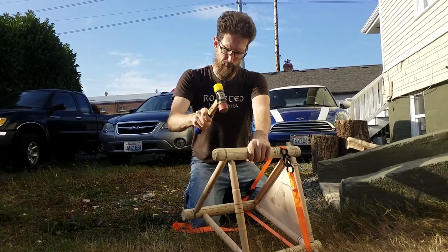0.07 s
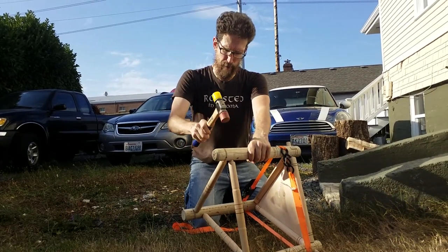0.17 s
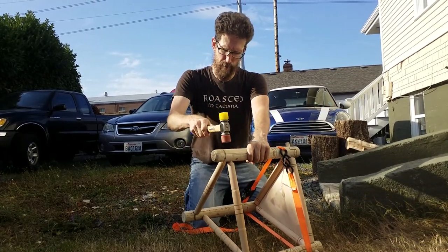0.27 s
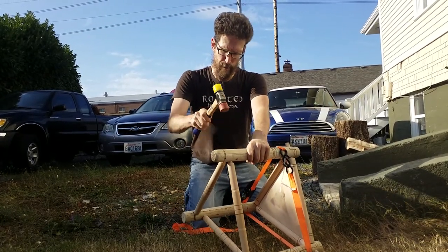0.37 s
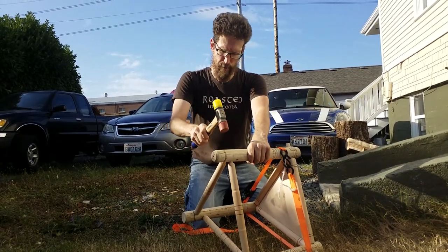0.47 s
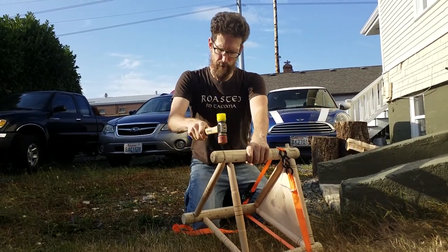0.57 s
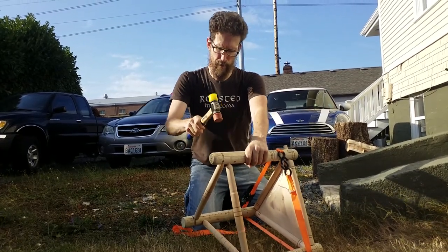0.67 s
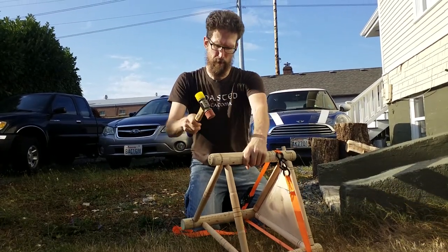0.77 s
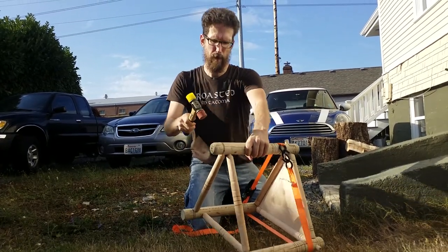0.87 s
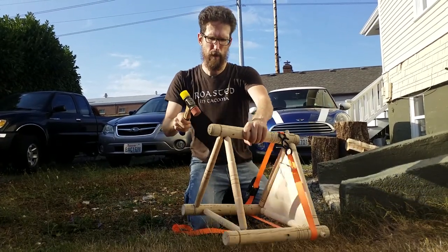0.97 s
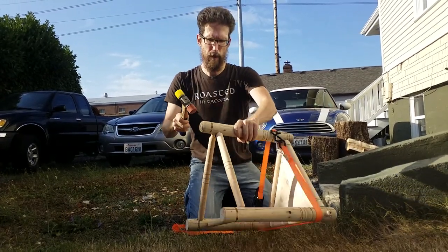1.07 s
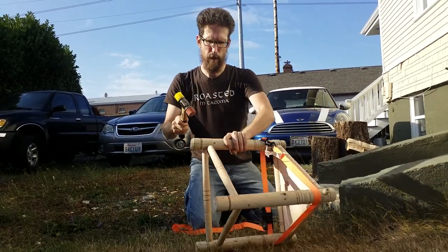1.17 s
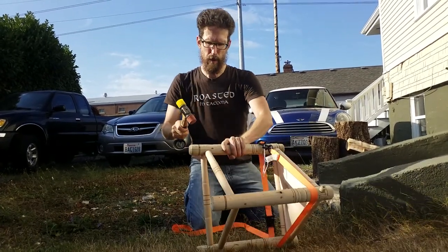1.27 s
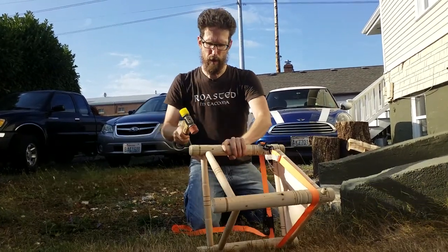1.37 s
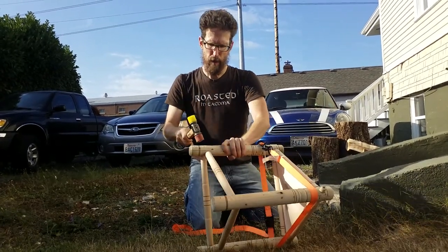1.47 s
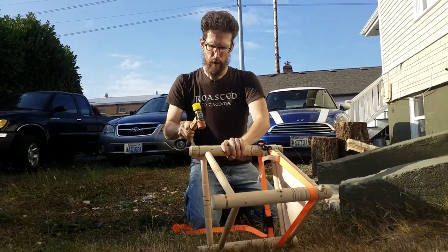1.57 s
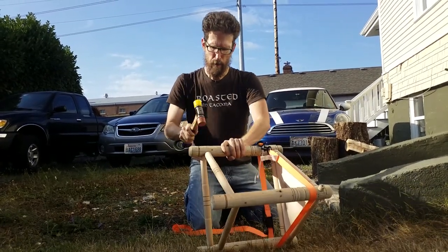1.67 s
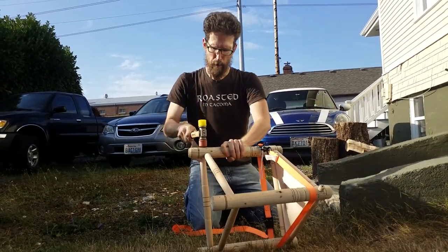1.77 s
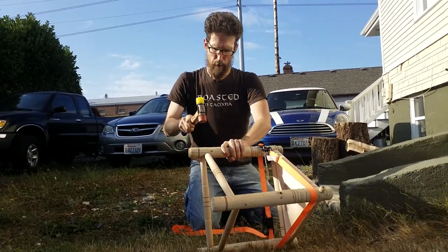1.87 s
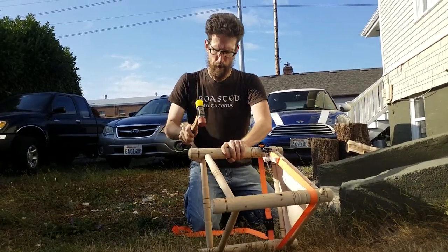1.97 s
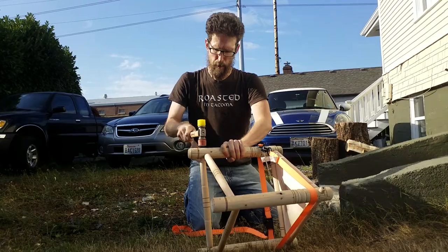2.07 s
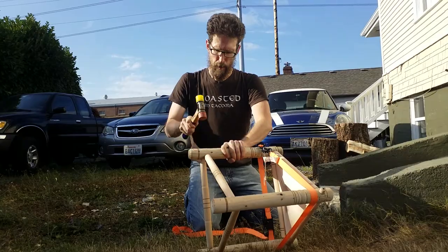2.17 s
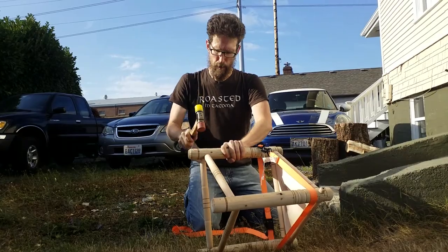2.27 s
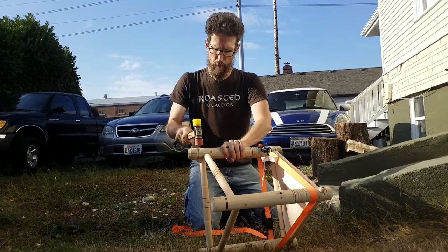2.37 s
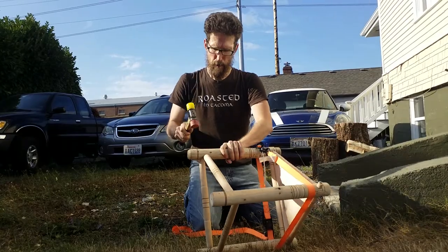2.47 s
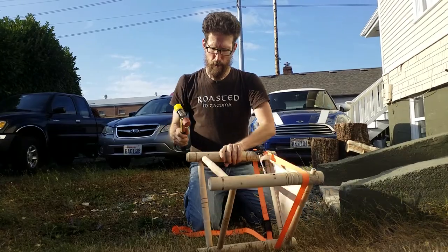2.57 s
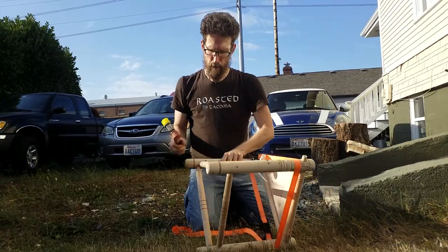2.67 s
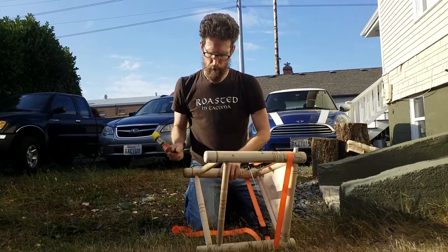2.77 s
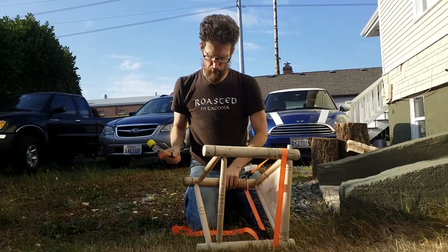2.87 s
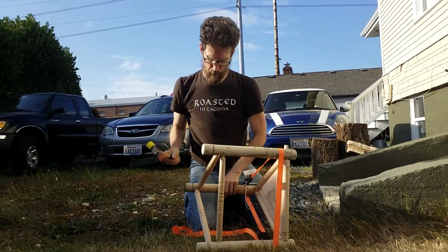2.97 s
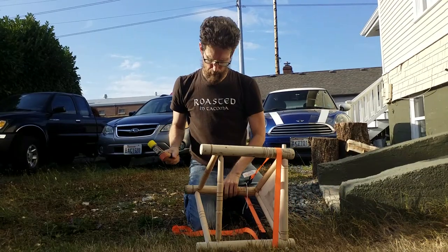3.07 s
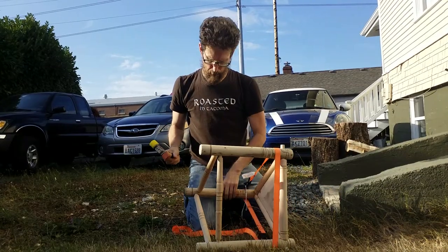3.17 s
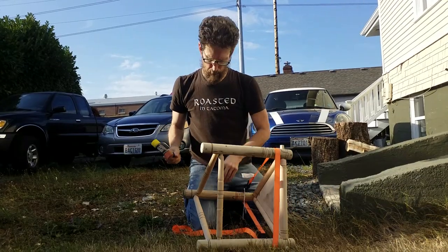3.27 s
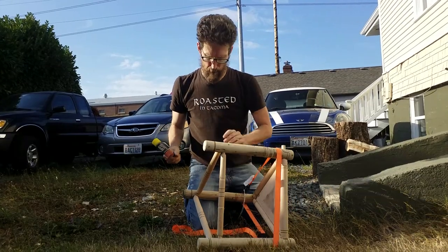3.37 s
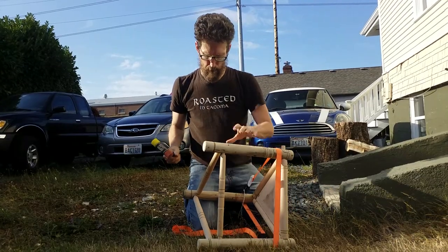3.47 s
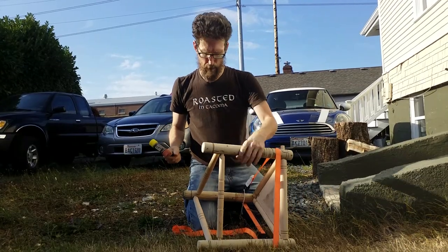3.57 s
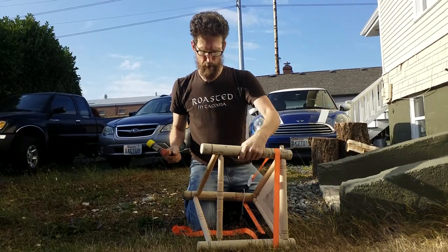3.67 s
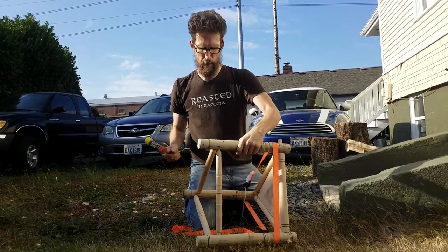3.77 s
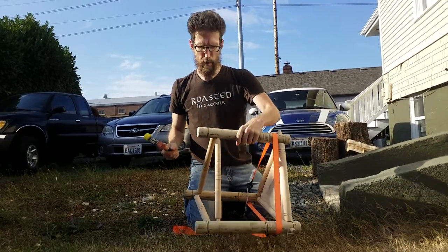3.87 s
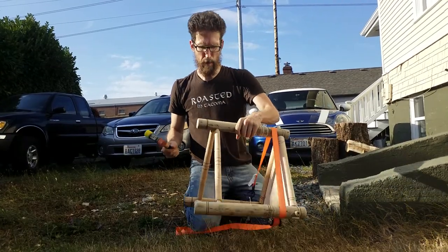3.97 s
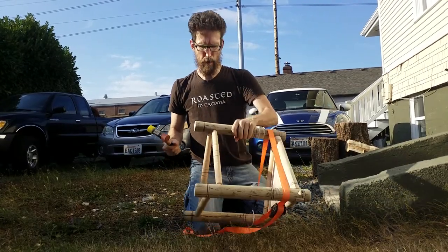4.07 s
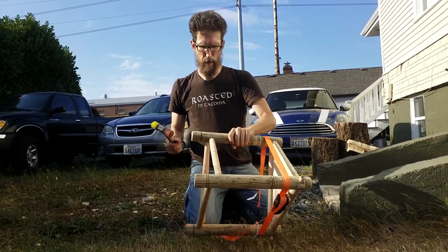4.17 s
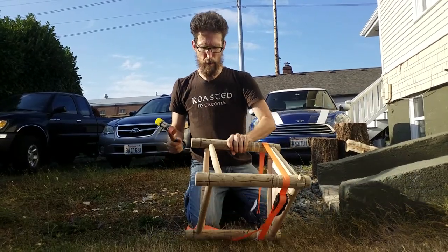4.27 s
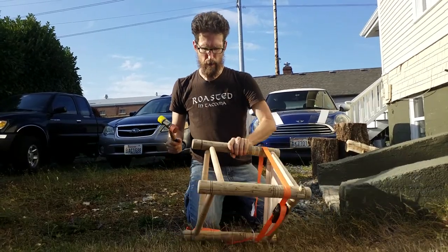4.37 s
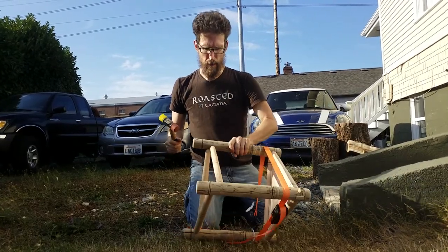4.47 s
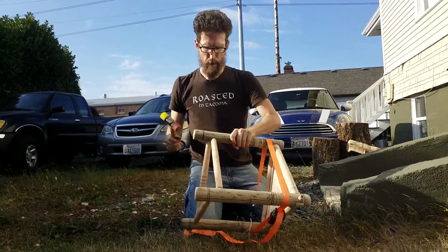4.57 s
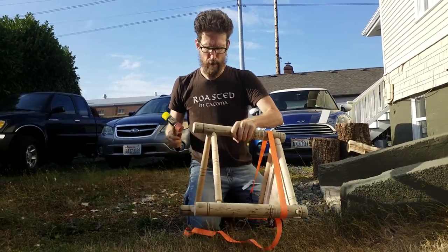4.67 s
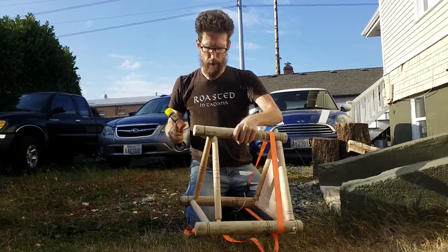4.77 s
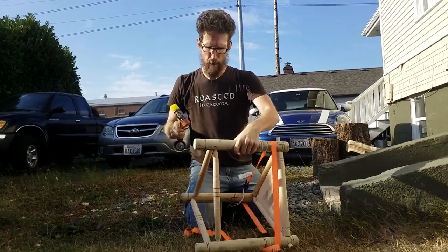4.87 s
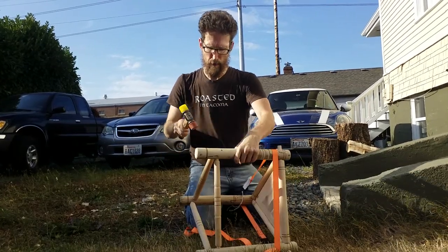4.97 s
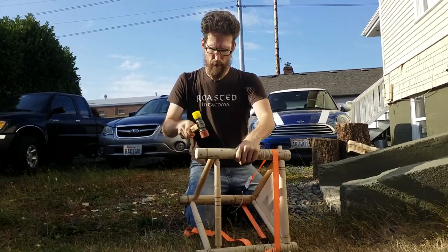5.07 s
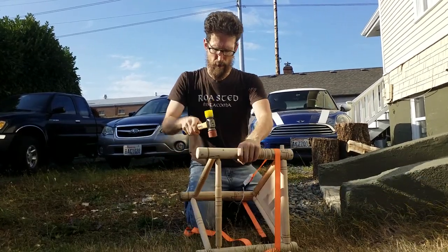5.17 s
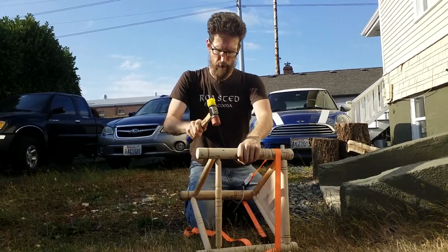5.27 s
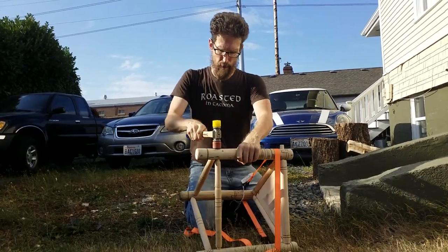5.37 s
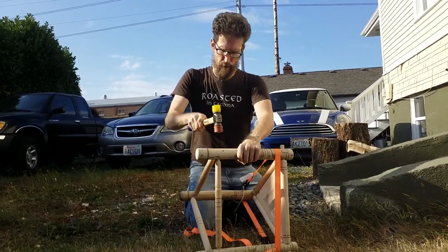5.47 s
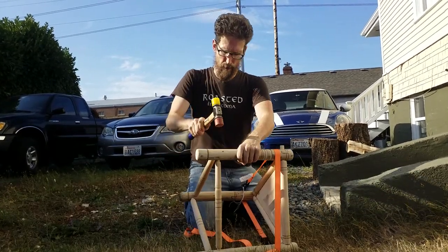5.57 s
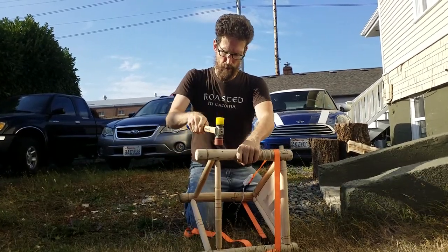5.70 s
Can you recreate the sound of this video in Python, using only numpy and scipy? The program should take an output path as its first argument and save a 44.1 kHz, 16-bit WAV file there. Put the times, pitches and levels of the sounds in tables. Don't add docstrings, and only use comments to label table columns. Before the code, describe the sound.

Hollow wooden knocks with loose chatter and a quick wall echo, straps hissing, dry grass scuffing, while vehicles drone and pass behind.

```python
import sys
import numpy as np
from scipy import signal
from scipy.fft import rfft, irfft, next_fast_len
from scipy.io import wavfile
from scipy.ndimage import uniform_filter1d

SR = 44100
rng = np.random.default_rng(int(sys.argv[2]) if len(sys.argv) > 2 else 0)


def convert_level_to_amplitude(level_db):
    exponent = np.asarray(level_db, float) / 20
    return 10 ** exponent


def master(y):
    cut = np.clip(np.atleast_2d(y).T, -1, 1)
    pcm = np.round(cut * 32767)
    wavfile.write(sys.argv[1], SR, pcm.astype(np.int16))


N = 252869
T = np.arange(N) / SR

# [t/s, nearness level/dB, exhaust effort level/dB]
VEHICLES = [(0.0, -3.5, -14), (0.4, -6, -11), (0.7, -11.5, -23), (0.95, -15.5, -13), (1.2, -12, -24.5),
            (1.55, -11, -20.5), (1.75, -13.5, -34), (2.4, -13.5, -39.5), (2.65, -13, -30), (3.0, -6, -18.5),
            (3.2, -6, -5.5), (3.6, 0.6, -2), (4.1, -0.5, 1), (4.28, -0.5, 2), (4.7, -2.5, -5.5),
            (4.95, -5.5, -9.5), (5.15, -5, -5.5), (5.73, -7, -14.5)]
# [t/s, f/Hz]
FIRING_RATE = [(0, 140.7), (.6, 134.7), (1.2, 141.9), (2.6, 143.6), (3.0, 142.3), (3.3, 140.2), (4.0, 141),
               (4.5, 143.1), (4.9, 140.5), (5.73, 143.1)]
CYLINDERS = 8
# [multiple, level/dB]
ORDER_LEVELS = [(1, -63.5), (2, -42), (3, -20), (4, -48), (5, -1.5), (6, -12.5), (7, -3), (8, 8), (9, -37),
                (10, -11), (11, -16.5), (12, -31), (13, -12), (14, -16), (15, -12.5), (16, -12), (17, -19),
                (18, -25), (19, -49), (20, -22.5), (21, -26), (22, -26.5), (23, -33), (24, -73)]
BOOM_CENTRES = [
    5,
    8,
    14.5,
    20,
]
# [closest-pass level/dB, share of nearness, share of effort,
# share of a beating twin tone, beat f/Hz, t/s of a beat's top]
BOOMS = [
    (-28.5, 0.05, 0.58, 0.51, 3.026, 3.56),
    (-16, 0.01, 0.97, 0.19, 4.85, 4.27),
    (-32, 1, 0.23, 0.045, 2.7, 3.9),
    (-39, 0.84, 0.2, 0.044, 2, 5.2),
]
TWIN_FADES = 0.16
ENGINE_PAN_DB = -0.65
# [start t/s, end t/s, f/Hz, level/dB]
HUMS = [(-.2, 0.48, 258, -30), (-.2, 0.254, 160, -38), (1.49, 2.397, 330, -47.5),
        (1.706, 2.5, 128.2, -50), (4.232, 4.666, 230.3, -22), (1.106, 1.85, 89.9, -35),
        (2.184, 3.2, 235, -45.5), (2.457, 3.407, 286, -42), (2.503, 3.201, 363, -43),
        (4.595, 5.304, 233.3, -32), (3.296, 4.05, 280.7, -29), (3.3, 4.26, 356.2, -34.5)]
# [f/Hz, level/dB]
ROAR_COLOUR = [(45, -28), (90, -6.5), (150, -10), (250, -19.5), (400, -20), (500, -20), (850, -16.5),
               (1200, -25), (2000, -34), (3000, -39), (5000, -48), (8000, -56.5)]
ROAR_DB = -40.5
# [t/s, f/Hz]
WHINE_PITCH = [(0, 3050), (3.4, 3100), (3.97, 3060), (4.06, 2870), (5.73, 2790)]
WHINE_FAR_DB, WHINE_NEAR_DB, WHINE_NEAR_S = -76.5, -47, 3.92
WHINE_COMES_DB_S, WHINE_GOES_DB_S = 21.5, 18
# [t/s, level/dB]
WIND = [(0.0, -32), (0.2, -34.5), (0.91, -27), (1.47, -34), (1.8, -40.5), (2.0, -60), (3.2, -70),
        (3.6, -44), (4.1, -37), (5.73, -38)]
# [f/Hz, correlation]
LIKENESS = [(25, 0.27), (60, 0.14), (125, 1), (1000, 0.87), (2000, 0.32), (8000, 0.16)]
# [top t/s, level/dB, swell s per 10 dB, fade s per 10 dB]
RUBS = [(0.0, -52, .05, 0.11), (.11, -58.5, .01, 0.064), (0.421, -55, .1, 0.016), (.656, -42, 0.024, 0.058),
        (.8, -46.5, 0.1, .12), (1.166, -41.5, 0.058, 0.086), (1.35, -61.5, 0.026, 0.18),
        (1.55, -63.5, 0.056, 0.52), (2.54, -59.5, 0.022, 0.081), (2.95, -55, 0.37, 0.13),
        (3.22, -51, 0.21, 0.21), (3.508, -40.5, 0.015, 0.096), (3.68, -44, .05, 0.59),
        (4.126, -45.5, 0.11, .03), (4.22, -67, 0.099, 0.085), (4.31, -38.5, 0.056, .02),
        (4.345, -22.5, 0.014, 0.011), (4.41, -48.5, 0.014, 0.016), (4.52, -43.5, 0.23, 0.067),
        (4.7, -55, 0.024, 0.085), (4.82, -41, 0.013, 0.075), (4.886, -29, 0.038, 0.027),
        (5.088, -36, 0.033, 0.023), (5.2, -55, 0.19, 0.16), (5.47, -68, 0.11, 0.02),
        (5.53, -63, 0.042, 0.089), (5.69, -58, 0.066, .015)]
STILL_GRASS_DB, HISS_TOP_HZ = -85, 15750
# [t/s, level/dB, t60/s, f/Hz, broad hiss level/dB]
STRAP_SHAKES = [
    (0.171, -22, 0.27, 8360, -15),
    (0.464, -20.5, 0.24, 9200, -24),
    (1.677, -20.5, 0.2, 9200, -32),
    (1.974, -54, 0.15, 8600, -17),
    (2.265, -47, 0.08, 8540, -20),
    (5.302, -37.5, 0.27, 9200, -1),
    (5.575, -29, 0.27, 8300, -6),
]

# [t/s, thud level/dB, knock level/dB, crack level/dB, chatter t60/s]
UPRIGHT = [
    (0.1725, -11, -12, -5, 0.022),
    (0.1775, -8, -16, -31, 0.068),
    (0.188, -13.5, -29, -16.5, 0.033),
]
UPRIGHT_AGAIN = [
    (0.461, -9, -11.5, -2, 0.018),
    (.465, -13, -11.5, -18, 0.034),
    (0.471, -12.5, -13.5, -13, 0.019),
    (0.48, -17.5, -23.5, -19, 0.07),
]
SEATING = [
    (1.6755, -32, -14.5, -13, 0.049),
    (1.686, -32, -13, -11.5, 0.03),
    (1.692, -40, -19.5, -23.5, 0.031),
    (1.699, -34, -25, -26.5, 0.1),
    (1.714, -45, -27, -40, .05),
    (1.7285, -45, -24, -40, .04),
]
TURNED = [
    (1.971, -42.5, -19.5, -20.5, 0.035),
    (1.975, -41.5, -12.5, -20, 0.04),
    (1.979, -46, -14.5, -26.5, 0.034),
    (1.988, -40, -26, -39, 0.046),
]
TURNED_AGAIN = [
    (2.2615, -40, -15.5, -30, 0.021),
    (2.2655, -49, -8.5, -14, 0.032),
    (2.27, -50, -15, -20.5, 0.026),
    (2.276, -47, -23.5, -33.5, 0.051),
]
SET_DOWN = [
    (4.894, -22, -23, -27.5, 0.049),
    (4.8895, -42, -26.5, -40, 0.03),
]
BACK = [
    (5.301, -19, -8, -13, 0.027),
]
BACK_REBOUND = [
    (5.3125, -12.5, -8, -30, 0.015),
    (5.317, -18, -16, -37.5, 0.059),
    (5.5865, -11.5, -5, -30, 0.026),
    (5.591, -12.5, -16, -31, .04),
    (5.6, -16, -23, -41.5, 0.082),
    (5.621, -40, -24, -45, .07),
]
LAST = [
    (5.5735, -30, -14.5, -12, 0.04),
]
# [f/Hz, level/dB, t60/s]
UPRIGHT_MODES = [(118, -3, 0.19), (254, 4, 0.18), (315, -5.5, 0.24), (390, -3, 0.1), (445, 3, 0.08),
                 (495, 2, .05), (630, 6, 0.015), (1097, 1, 0.02), (1298, -4, 0.016), (1478, -2, 0.016),
                 (2150, -9.5, .02), (2470, -14, 0.018), (2860, -7, 0.015), (3500, -7, 0.012),
                 (4930, -20, 0.017)]
UPRIGHT_AGAIN_MODES = [(116.5, -1.5, 0.19), (251.5, 5, 0.12), (322, -2.5, 0.19), (395, -1, 0.1),
                       (480, 3, 0.06), (545, 4, 0.06), (706, -4, .02), (1190, 1.5, 0.022),
                       (1330, -3.5, 0.017), (2050, -14.5, .02), (2300, -11, 0.0098), (2796, -15, 0.015),
                       (3650, -29, 0.013)]
SEATING_MODES = [(247, -2, 0.25), (330, -4.5, 0.099), (466, -15, 0.055), (617, 1, 0.025), (931, -1, 0.03),
                 (1233, 0, 0.025), (1400, -1, 0.017), (1534, -10, 0.022), (2050, -13, 0.02),
                 (2360, -9.5, 0.025), (2750, -12.5, 0.025), (3400, -25, .015)]
TURNED_MODES = [(179, -20, 0.074), (253.4, 7, 0.19), (406, 8.5, 0.22), (420, -2, 0.15), (656, -5, 0.011),
                (1084, 2, 0.03), (1320, -2, 0.025), (1580, -4, .015), (2070, -1.5, 0.014),
                (2520, -5.5, 0.01), (3355, -8.5, 0.0236), (3540, -17.5, 0.008), (4670, -8.5, 0.0085)]
TURNED_AGAIN_MODES = [(179, -20, 0.074), (249, 10, 0.29), (390, 9, 0.19), (535, -4.5, 0.0185),
                      (756, -9.5, 0.025), (1120, -13, 0.02), (1380, 3, 0.022), (2310, -6.5, 0.011),
                      (3395, -10.5, 0.034), (3650, -11, .01), (4560, -15, 0.008)]
SET_DOWN_MODES = [(250, -4, 0.12), (369, -1, .06), (650, 1, .015), (1110, -3, .015), (1480, -3, .01),
                  (2300, -7, .012), (3700, -10, .01)]
BACK_MODES = [(120, 6, 0.15), (181, -6, 0.021), (251, -4, 0.21), (370, 3.5, 0.061), (600, -13, 0.0399),
              (826, -10, 0.0092), (1550, 5, 0.0078), (1850, -1, 0.007), (3640, -15.5, 0.01),
              (4626, -8, 0.013)]
REBOUND_MODES = [(120.5, 4, 0.1), (177, 5, 0.027), (254.5, -7, 0.2), (370, 2, 0.076), (589, -2, 0.045),
                 (833, -2, 0.012), (1174, -0.5, 0.032), (1665, -3.5, 0.014), (1993, -11, 0.027),
                 (2270, -7.5, 0.0187), (2644, -9.5, 0.014), (3700, -23, 0.018), (4530, -22, 0.017)]
LAST_MODES = [(254, 0, 0.1), (800, -1.5, 0.0086), (1250, 1.5, 0.012), (1750, -4, 0.01), (2500, -6, 0.0089),
              (3650, -5.5, 0.013), (4600, -9.5, 0.012)]
STRIKE_DB = 9
RING_SHARE = 0.7
# [t/s, level/dB]
CRACK_AIR = [(0.18, -1), (0.47, -29), (1.685, -21.5), (1.973, 0.5), (2.263, -8.5), (4.89, 5), (5.305, 9.5),
             (5.58, 8)]
# [delay t/s, level/dB, left minus right level/dB]
ECHOES = [(0.02, -24, 2), (.040, -23, 2.5), (.0535, -19.5, -1), (.063, -26, -0.5), (.09, -26, 3)]
SLAP_S, SLAP_DB = 0.0535, -16
# [t/s, peak level/dB, top f/Hz, fade t/s, left minus right level/dB]
BUFFETS = [(0.826, -37, 494, 0.0069, -8), (0.853, -18, 296, 0.017, 10), (0.886, -25, 440, 0.014, 19),
           (0.955, -18, 248, 0.024, 12), (1.008, -16, 230, 0.028, 15), (1.04, -17, 262, 0.016, 14),
           (1.084, -24, 390, .008, 10), (1.254, -24, 260.2, 0.013, 9)]
# [t/s, level/dB, f/Hz, t60/s]
TICKS = [(1.342, -51, 10000, 0.003), (1.378, -58.5, 9500, .005), (4.322, -47, 1400, .03),
         (4.335, -47, 1450, .04), (4.347, -34.5, 1400, 0.05), (4.351, -38, 1430, .05),
         (4.356, -37.5, 3700, 0.043), (4.357, -42, 850, .02), (4.4097, -28, 10600, 0.0047),
         (4.54, -39, 10900, 0.0065), (4.636, -46, 10900, 0.0064), (4.8925, -20, 570, 0.023),
         (4.894, -19.5, 734, 0.023)]
# [f/Hz, width f/Hz, level/dB]
PORT_RESONANCES = [(9200, 973, 17), (15100, 1500, -6.5)]
TOP_HZ = 16800


def unit(x):
    return x / np.sqrt(np.mean(x ** 2))


def curves(table):
    s, *columns = np.transpose(table)
    return [np.interp(T, s, c) for c in columns]


def band(x, lo_hz, hi_hz, order=2):
    sos = signal.butter(order, [lo_hz, min(hi_hz, .45 * SR)], "band", fs=SR, output="sos")
    return signal.sosfilt(sos, x)


def below(x, hz):
    return signal.sosfilt(signal.ellip(8, .3, 60, hz, fs=SR, output="sos"), x)


def ring(x, hz, t60):
    r = 1000 ** (-1 / (t60 * SR))
    w = 2 * np.pi * hz / SR
    return signal.lfilter([np.sin(w)], [1, -2 * r * np.cos(w), r * r], x)


def walk(rate):
    k = int(SR / rate)
    held = np.repeat(rng.standard_normal(N // k + 1), k)[:N]
    return 1.9 * uniform_filter1d(uniform_filter1d(held, k), k)


def wide(hz):
    table_hz, likeness = np.transpose(LIKENESS)
    c = np.clip(np.interp(np.log(hz), np.log(table_hz), likeness), 0, 1)
    mid, side = rng.standard_normal((2, N))
    return np.sqrt((1 + c) / 2) * mid + np.sqrt((1 - c) / 2) * side * np.array([[1], [-1]])


def swell(top_s, top_db, comes_db_s, goes_db_s):
    slope = np.where(T < top_s, comes_db_s, goes_db_s)
    return convert_level_to_amplitude(top_db - slope * np.abs(T - top_s))


def engine():
    step = 16
    t = T[::step]
    near_db, effort_db = np.array(curves(VEHICLES))[:, ::step]
    twin = convert_level_to_amplitude(TWIN_FADES * effort_db)
    boom_db = []
    for top, near_share, effort_share, rock, beats, top_s in BOOMS:
        beating = np.abs(1 + rock * twin * np.exp(2j * np.pi * beats * (t - top_s))) + 1e-3
        boom_db.append(top + near_share * near_db + effort_share * effort_db + 20 * np.log10(beating))
    turn = 2 * np.pi * np.cumsum(curves(FIRING_RATE)[0] / CYLINDERS)[::step] / SR
    order, db = np.transpose(ORDER_LEVELS)
    home = np.abs(order[:, None] - BOOM_CENTRES).argmin(1)
    out = 0
    for k, d, h in zip(order, db, home):
        gain = convert_level_to_amplitude(d - db[home == h].max() + boom_db[h] + 1.36 * walk(8.8)[::step])
        wander = 2 * np.pi * rng.random() + 0.15 * np.sqrt(k) * walk(7.7)[::step]
        apart = 0.058 * walk(1.0)[::step] * np.array([[1], [-1]])
        out = out + 1.37 * gain * np.sin(k * turn + wander + apart)
    for start, end, hz, hum_db in HUMS:
        flutter, drift = convert_level_to_amplitude(1.3 * walk(11)[::step]), .25 * walk(10)[::step]
        fade = np.clip(np.minimum(t - start, end - t) / 0.13, 0, 1)
        out = out + fade * convert_level_to_amplitude(hum_db) * flutter * np.sin(2 * np.pi * hz * t + drift)
    return signal.resample_poly(out, step, 1, axis=1)[:, :N]


def road():
    size = next_fast_len(N)
    octave = np.log2(np.arange(1, size // 2 + 2) * SR / size)
    colour_hz, colour_db = np.transpose(ROAR_COLOUR)
    colour = convert_level_to_amplitude(np.interp(octave, np.log2(colour_hz), colour_db))
    roar = 0
    for c in range(6, 14):
        overlap = np.cos(np.pi / 2 * np.clip(octave - c, -1, 1))
        noise = irfft(rfft(wide(2. ** c), size) * colour * overlap, size)[:, :N]
        roar = roar + convert_level_to_amplitude(0.5 * walk(9.9)) * noise
    roar /= np.sqrt(np.mean(band(roar.mean(0), 737, 2200) ** 2))
    roar_db = ROAR_DB + curves(VEHICLES)[0]

    carrier = np.cos(2 * np.pi * np.cumsum(curves(WHINE_PITCH)[0]) / SR)
    passing = convert_level_to_amplitude(WHINE_FAR_DB) + swell(WHINE_NEAR_S, WHINE_NEAR_DB, WHINE_COMES_DB_S, WHINE_GOES_DB_S)
    whine = unit(carrier * band(wide(3000), 5.4, 190)) * passing * convert_level_to_amplitude(2.0 * walk(24.91))

    gusts = convert_level_to_amplitude(2.2 * walk(5))
    wind = unit(band(wide(40), 32, 150)) * convert_level_to_amplitude(curves(WIND)[0] - 2.5) * gusts
    return roar * convert_level_to_amplitude(roar_db) + whine + wind


def rustle():
    clicks = rng.random((2, N)) < 5000 / SR
    sizes = convert_level_to_amplitude(2.3 * np.minimum(rng.exponential(size=(2, N)), 5))
    grains = clicks * sizes * rng.standard_normal((2, N))
    scrape = unit(grains) + wide(9000)
    rub = unit(band(scrape, 5530, 16000) + convert_level_to_amplitude(1.5) * band(scrape, 1300, 6000, order=1))
    power = convert_level_to_amplitude(STILL_GRASS_DB) ** 2
    for s, db, rise, fall in RUBS:
        power = power + swell(s, db, 10 / max(rise, .004), 10 / max(fall, .004)) ** 2
    return rub * np.sqrt(power) * convert_level_to_amplitude(-8.5 + 1.63 * walk(30))


def shakes():
    out = np.zeros((2, N))
    hiss = rng.standard_normal((2, N)) * convert_level_to_amplitude(1.9 * walk(190))
    for s, db, t60, hz, broad_db in STRAP_SHAKES:
        i = int(s * SR)
        t = np.arange(min(SR // 2, N - i)) / SR
        burst = hiss[:, i:i + len(t)] * (1 - np.exp(-t / 0.0079)) * 1000 ** (-t / t60)
        sizzle = band(burst, 0.92 * hz, 1.01 * hz, order=1)
        broad = convert_level_to_amplitude(broad_db) * band(burst, 6500, 16000, order=1)
        out[:, i:i + len(t)] += convert_level_to_amplitude(db) * (sizzle + broad)
    return out


def knocks(contacts, modes):
    out = np.zeros((2, N + SR // 4))
    long = np.arange(SR // 4) / SR
    push = np.sin(np.pi * np.minimum(long / 0.002, 1))
    thud = sum(convert_level_to_amplitude(g) * ring(push, hz, d) for hz, g, d in modes if hz < 500)
    t = long[:SR // 8]
    apart = .8 * np.array([[1], [-1]])
    for s, thud_db, knock_db, crack_db, t60 in contacts:
        noise = rng.standard_normal((6, len(t)))
        fade = 1000 ** (-t / np.clip(t60, .004, .2))
        chatter = noise[0] + 0.086 * noise[4:] + apart * band(noise[1], 2100, 9000)
        chatter = chatter * fade * (1 - np.exp(-t / 0.00088))
        chatter[:, SR // 1000] += convert_level_to_amplitude(STRIKE_DB)
        knock = sum(convert_level_to_amplitude(g) * ring(chatter, hz, RING_SHARE * d) for hz, g, d in modes if hz >= 500)
        knock = knock / np.abs(knock).max()
        knock = knock + convert_level_to_amplitude(-9.5) * band(chatter, 310, 2400, order=3)
        knock = knock + convert_level_to_amplitude(-10) * band(chatter, 910, 2100, order=1)

        snap = (noise[2] + apart * noise[3]) * fade ** 3.02 * (1 - np.exp(-t / 0.00058))
        air_db = np.interp(s, *np.transpose(CRACK_AIR))
        crack = band(snap, 8020, 10120) + convert_level_to_amplitude(-21.0) * band(snap, 2500, 12000, order=1)
        crack = crack + convert_level_to_amplitude(air_db) * band(snap, 9400, 14400)
        i = int(s * SR)
        out[:, i:i + len(long)] += convert_level_to_amplitude(thud_db + 6.5) * thud / np.abs(thud).max()
        out[:, i:i + len(t)] += convert_level_to_amplitude(knock_db + 5) * knock + convert_level_to_amplitude(crack_db + 3.5) * crack
    return out[:, :N]


def yard(x):
    t = np.arange(SR // 3) / SR
    tail = rng.standard_normal((2, len(t))) * 1000 ** (-t / 0.24) * (1 - np.exp(-t / 0.008))
    reply = convert_level_to_amplitude(-32.5) * tail
    for delay, db, pan_db in ECHOES:
        reply[0, int(delay * SR)] += convert_level_to_amplitude(db + pan_db / 2)
        reply[1, int((delay + pan_db * 3e-5) * SR)] += convert_level_to_amplitude(db - pan_db / 2)
    slap = np.roll(x.mean(0), int(SLAP_S * SR)) * (T > SLAP_S)
    wet = signal.fftconvolve(x.mean(0, keepdims=True), reply, axes=1)[:, :N]
    return convert_level_to_amplitude(-8) * band(wet, 300, 7600) + convert_level_to_amplitude(SLAP_DB) * band(slap, 1300, 2000, order=1)


def bumps():
    out, t = np.zeros((2, N + SR)), np.arange(SR // 4) / SR
    for s, db, hz, fade_s, pan_db in BUFFETS:
        puff = rng.standard_normal(len(t)) * np.exp(-t / fade_s) * (1 - np.exp(-t / 0.0029))
        thump = band(puff, 119, hz)
        gain = convert_level_to_amplitude(db + pan_db / 2 * np.array([[0], [-2]]))
        i = int(s * SR)
        out[:, i:i + len(t)] += gain * thump / np.abs(thump).max()
    return out[:, :N]


def ticks():
    out, t = np.zeros(N), np.arange(SR // 10) / SR
    for s, db, hz, t60 in TICKS:
        click = 0.15 * rng.standard_normal(len(t)) * np.exp(-t / (0.14 * t60))
        click[0] += 1
        tick = ring(click, hz, 0.76 * t60) - 0.32 * ring(click, 1.3 * hz, 0.6 * t60)
        i = int(s * SR)
        out[i:i + len(t)] += convert_level_to_amplitude(db) * tick
    return out


def scene():
    around = engine() * convert_level_to_amplitude(ENGINE_PAN_DB / 2 * np.array([[1], [-1]])) + road()
    around = around + below(shakes() + rustle(), HISS_TOP_HZ) + ticks()
    blows = [(UPRIGHT, UPRIGHT_MODES), (UPRIGHT_AGAIN, UPRIGHT_AGAIN_MODES), (SEATING, SEATING_MODES),
             (TURNED, TURNED_MODES), (TURNED_AGAIN, TURNED_AGAIN_MODES), (SET_DOWN, SET_DOWN_MODES),
             (LAST, LAST_MODES), (BACK, BACK_MODES), (BACK_REBOUND, REBOUND_MODES)]
    stool = band(sum(knocks(*blow) for blow in blows), 115, 20000)
    return stool + yard(stool) + bumps() + around


def band_limit(x):
    return signal.sosfilt(signal.butter(12, 16830, fs=SR, output="sos"), x)


def record(dry):
    x = dry
    for hz, width, db in PORT_RESONANCES:
        x = x + convert_level_to_amplitude(db) * band(dry, hz - width / 2, hz + width / 2, order=1)
    rounded = np.tanh(0.75 * x) / 0.92
    mix = below(band(rounded, 26, 19000), TOP_HZ)
    return band_limit(mix)


dry = scene()
out = record(dry)
master(out)
```